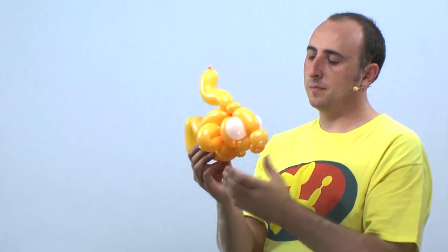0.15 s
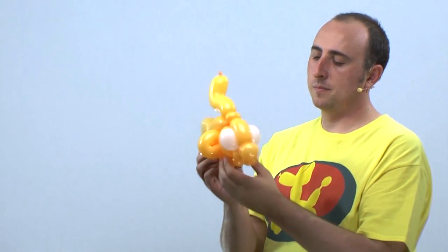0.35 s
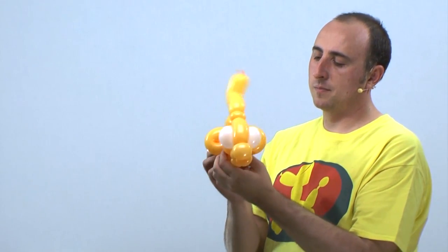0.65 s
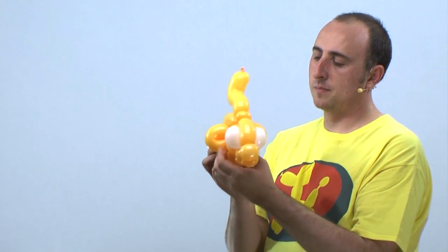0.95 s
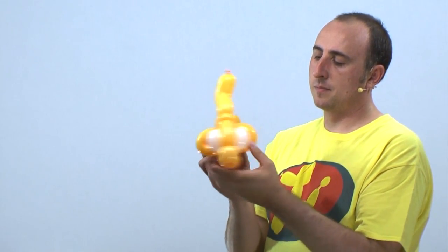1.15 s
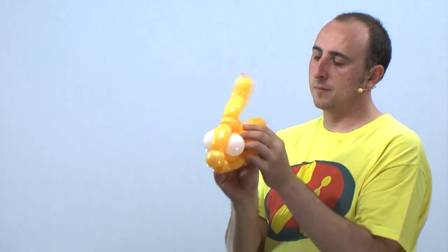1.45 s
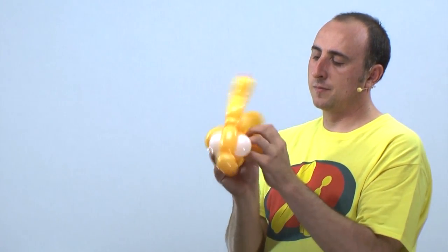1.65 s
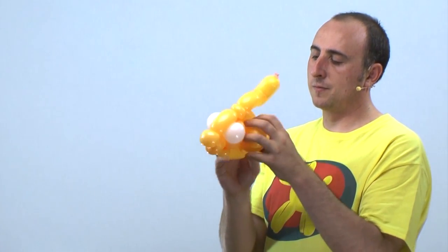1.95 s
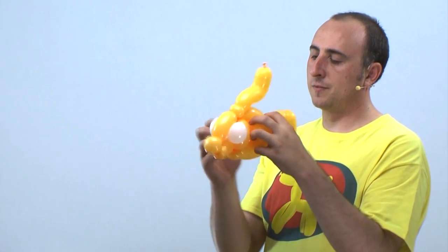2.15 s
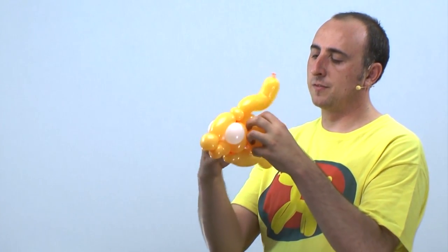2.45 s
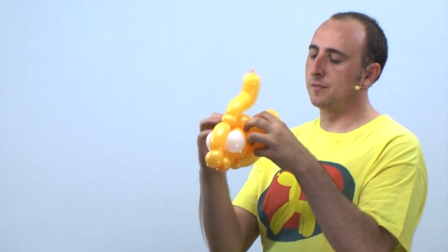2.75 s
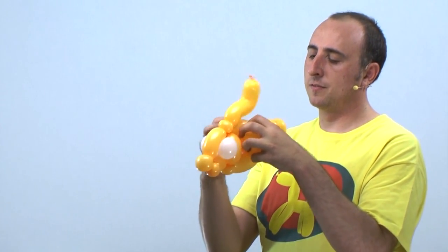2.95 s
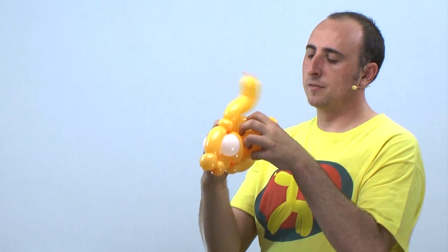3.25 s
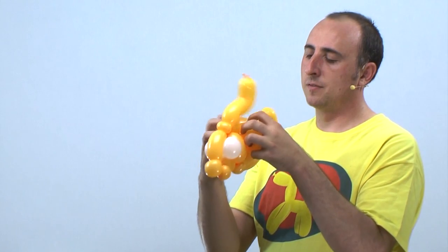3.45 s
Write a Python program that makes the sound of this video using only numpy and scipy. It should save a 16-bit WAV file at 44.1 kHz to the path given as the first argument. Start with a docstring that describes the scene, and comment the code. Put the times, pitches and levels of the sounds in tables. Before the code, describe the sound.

Rubber balloons rub against each other in someone's hands, close up in a quiet, dry studio. They squeak first, then crackle and snap with each squeeze, pause briefly, and resume with a creak and final squeaks.

```python
"""Hands twist and press a figure of inflated latex balloons in a dry studio, close to a small microphone.
Rubber sticks and slips; each slip rings briefly in the taut skins. First come short, regular squeaks
and two fingertip whistles. From 0.4 s a squeeze gives dense crackle and single snaps. After a lull,
more squeezes follow from 1.5 s, then one long creak at 3.1 s, last snaps and squeaks and a low thump."""
import sys
import numpy as np
from scipy import signal
from scipy.fft import rfft, irfft, next_fast_len
from scipy.io import wavfile

SR = 44100
rng = np.random.default_rng(int(sys.argv[2]) if len(sys.argv) > 2 else 0)


def log_audio(samples):
    """Write samples as a 16-bit WAV file to the path given in sys.argv[1]."""
    # one column per channel
    frames = np.atleast_2d(samples).T
    # limit to full scale, then quantise
    limited = np.clip(frames, -1, 1)
    pcm = np.round(limited * 32767).astype(np.int16)
    wavfile.write(sys.argv[1], SR, pcm)


N = 158760

# noise floor: f/Hz, level/dB
AIR_SPECTRUM = [(15, -32), (40, -9), (120, -7), (911, -7), (3250, -14), (9840, -29), (16000, -34)]
# whistles: t/s, length/s, top f/Hz, peak level/dB
WHISTLE_EVENTS = [(0.177, 0.037, 1556, -28), (0.263, 0.019, 1317, -35)]
# course of the creak: t/s, slip rate/Hz, level/dB
CREAK_PATH = [(3.085, 610, -5), (3.095, 830, -11), (3.110, 680, -13.5), (3.122, 370, -11.5),
              (3.132, 170, -10), (3.144, 500, -11.5), (3.161, 440, -9), (3.176, 230, -13.5),
              (3.183, 250, -8), (3.198, 260, -11.5), (3.217, 640, -12), (3.242, 290, -18)]
# modes of the creaking skin: f/Hz, base width/Hz, level/dB
CREAK_MODES = [(1295, 130, 3.5), (1784, 31, -5.5), (3250, 640, -1), (5130, 38, -15.5), (6570, 910, -9),
               (10250, 310, -19.5), (12600, 520, -18), (15700, 300, -21)]
# rubbing strokes: t/s, length/s, first level/dB, last level/dB, bass/dB, upper mid/dB, treble/dB
RUB_STROKES = [(0.167, 0.047, -62, -58.5, 19, 22, 22.5), (0.299, 0.04, -53, -70, 11, 13.5, 21.5),
               (0.378, 0.014, -37, -42, -17, 0, 3), (0.416, 0.085, -26, -31.5, -21.5, -7, -3),
               (0.47, 0.0067, -12.5, -24.5, 0, 4, 3.5), (0.51, 0.022, -22, -22, -11, -2.5, -5),
               (0.547, 0.014, -21, -26, -3, -1, 1), (0.578, 0.087, -29.5, -24, 0, 4, 0.5),
               (0.673, 0.17, -24.5, -28.5, -1, 1.5, -3.5), (0.812, 0.083, -33, -27.5, -13, 1, -4),
               (0.903, 0.097, -33.5, -23, -5.5, -2, -9.5), (0.965, 0.075, -31.5, -20.5, -8, -3, -5.5),
               (1.055, 0.033, -40, -20, -10, -1, -2), (1.287, 0.021, -28.5, -58, -36, 10.5, -10),
               (1.412, 0.02, -46.5, -57, -11, 5, 1), (1.478, 0.046, -40, -60, -3, -2, -5),
               (1.508, 0.053, -28.5, -28.5, 0, 1, -6), (1.566, .130, -24.5, -24, -0.5, -0.5, -5),
               (1.698, 0.065, -27.5, -27.5, 0, 0.5, -4), (1.777, 0.086, -28, -24.5, -4, 2, -6),
               (1.838, 0.097, -28.5, -37, -0.5, -0.5, -5), (1.961, 0.11, -33.5, -38.5, 2.5, 9.5, -4),
               (2.084, 0.02, -27.5, -25.5, -10, 0.5, -3), (2.158, 0.014, -31, -40, 2.5, 7, -4),
               (2.258, 0.051, -46, -36.5, 8, 12, -1), (2.348, 0.093, -35.5, -31, 9, 3.5, -8),
               (2.444, 0.16, -27, -28.5, 2.5, 5.5, -6), (2.601, 0.063, -31.5, -24, 4, 2, -11.5),
               (2.678, 0.078, -37, -41, 6, 2, -11), (2.761, 0.031, -23.5, -28.5, -0.5, 4.5, -10),
               (2.808, 0.028, -38, -27.5, 5.5, 2.5, -10), (2.849, 0.061, -23.5, -41, -2.5, 5.5, -2),
               (2.921, 0.035, -39, -33.5, 6, 9.5, -10), (2.973, 0.1, -31, -37, 9.5, 11, 1.5),
               (3.225, 0.057, -21.5, -40, -10, -6, -14), (3.276, 0.036, -31.5, -31, -2, 5.5, -9),
               (3.339, 0.079, -45, -48, 6, -0.5, -12), (3.419, 0.084, -38, -31, 8, -2, -15.5),
               (3.575, 0.022, -43, -30, -2, 4.5, -12)]
# squeaks, plus one bright snap (2.619 s) and one low thump (3.529 s, a single slip):
# t/s, length/s, first slip rate/Hz, last slip rate/Hz, level/dB, bass/dB, treble/dB, ring f/Hz
SLIP_BURSTS = [(0.0277, 0.021, 320, 380, -19, -7, 7, 4250), (.043, 0.014, 244, 370, -6.5, -3.5, 3.5, 900),
               (0.06, 0.038, 710, 450, -12, -14, 1.5, 4150), (.157, .012, 840, 980, -20.5, -50, 13.5, 3280),
               (0.341, 0.021, 990, 600, -26, 7, 18, 4350), (0.3665, 0.013, 630, 820, -9, -2, 5.5, 4760),
               (0.414, 0.006, 1380, 590, -9, -1, 5, 1310), (0.458, 0.0087, 970, 920, -5, 9.5, 2.5, 6550),
               (1.0792, 0.014, 310, 202, -3, 2, 3.5, 830), (1.2592, 0.027, 610, 830, -10.5, -5, 4, 5100),
               (1.94, 0.018, 260, 416, -1, 1.5, 4, 556), (2.078, 0.0081, 640, 560, -5.5, 6, 2, 3100),
               (2.128, 0.011, 950, 500, -7.5, 8, 5, 3060), (2.619, 0.0034, 900, 900, -8.5, -10, 14, 9000),
               (2.6477, 0.025, 226, 174, -4.5, -14, 2.5, 2970), (3.529, .001, 300, 300, -3.5, 16, 6, 2830),
               (3.3207, 0.016, 420, 270, -0.5, -3.5, 3, 2650), (3.551, 0.0095, 590, 640, -3, 0, 2, 2840)]
# snaps: t/s, level/dB
SNAP_EVENTS = [(.613, -5), (.726, -2.5), (0.747, 0), (0.829, -5), (.870, 0), (.912, -3.5), (0.9247, 4.5),
               (0.934, -9), (.945, -4.5), (1.051, -4.5), (1.206, -27), (1.341, -24.5), (1.616, -6),
               (1.632, -21), (1.645, -18), (1.658, -17), (1.784, -7), (2.229, -28), (2.437, -12),
               (2.463, -8), (2.498, -9), (2.596, -23), (2.755, -18.5), (2.799, -1), (2.964, -7.5),
               (3.46, -11), (3.4695, -10), (3.48, -2)]
# skin response: f/Hz, level/dB
SKIN_RESPONSE = [(60, -20.5), (153, -3.5), (427, 3.5), (636, 7), (991, 7.5), (1310, 5.5), (1910, -5),
                 (3580, -3), (6000, -5.5), (13000, -10), (16000, -9.5)]
# colour registers (bass, mid, upper mid, treble): f/Hz
COLOUR_HZ = [300, 1200, 3500, 10000]

PATCH_DB, PATCH_RATE_HZ = 3.5, 19.2  # swell and fade of each resonance
FIRM_SPREAD_DB = 2.5  # grip scatter of snaps and slip bursts


def amp(db):
    """Decibels to gain."""
    return 10 ** (np.asarray(db) / 20)


def unit_rms(x):
    """Scale to rms 1."""
    return x / np.sqrt(np.mean(x ** 2) + 1e-20)


def drift(rate_hz):
    """Smooth random curve, spread 1."""
    hop = 40
    r = np.exp(-2 * np.pi * hop * rate_hz / SR)
    slow = signal.lfilter([1], [1, -2 * r, r * r], rng.standard_normal(N // hop + 2002))[2000:]
    return np.interp(np.arange(N) / hop, np.arange(len(slow)), unit_rms(slow))


def resonate(x, hz, width_hz):
    """Two-pole resonance, unit peak gain."""
    r = np.exp(-np.pi * width_hz / SR)
    poles = [1, -2 * r * np.cos(2 * np.pi * hz / SR), r * r]
    return signal.lfilter(np.array([1, 0, -1]) * (1 - r * r) / 2, poles, x + 1e-18)


def slip_times(path_s, rate_hz, jitter):
    """One slip at the start, then one per step of sliding; jitter in steps."""
    t = np.arange(path_s[0], path_s[-1], 1 / SR)
    steps = np.cumsum(np.interp(t, path_s, rate_hz)) / SR
    wobble = rng.standard_normal(200)
    whole = np.arange(int(steps[-1]) + 1)
    return np.interp(whole + jitter * wobble[whole] * (whole > 0), steps, t)


def air(level_db=-52.5):
    """Faint steady room and microphone noise."""
    hz, db = np.transpose(AIR_SPECTRUM)
    bins_hz = np.maximum(np.arange(N // 2 + 1) * SR / N, 1)
    shape = amp(np.interp(np.log(bins_hz), np.log(hz), db))
    return amp(level_db) * unit_rms(irfft(rfft(rng.standard_normal(N)) * shape, N))


def room(x, t60_s=0.19, cut_hz=20000, level_db=-22):
    """Reflections: ten feedback delays, duller each round."""
    size = next_fast_len(N + SR)
    hz = np.arange(size // 2 + 1) * SR / size
    response = 0
    for k, lag_s in enumerate(np.geomspace(.007, .023, 10)):
        loss = amp(-60 * lag_s / t60_s) / (1 + 1j * hz / cut_hz) ** (lag_s / .015)
        loop = loss * np.exp(-2j * np.pi * hz * lag_s)
        response += (-1) ** k * loop / (1 - loop)
    return amp(level_db) * irfft(rfft(x, size) * response, size)[:N]


def whistles(arch_depth=0.078, overtone_db=-16.5):
    """A fast-sliding fingertip squeals: near-sine, arched in pitch and level."""
    t, out = np.arange(N) / SR, 0
    waver = 0.038 * drift(110)
    for start_s, length_s, hz, db in WHISTLE_EVENTS:
        arch = np.sin(np.pi * np.clip((t - start_s) / length_s, 0, 1)) ** .5
        phase = 2 * np.pi * np.cumsum(hz * (1 + arch_depth * (arch - 1) + waver)) / SR
        overtones = sum(np.sin(k * phase) for k in range(2, 5))
        out += amp(db) * arch * (np.sin(phase) + amp(overtone_db) * overtones)
    return out


def creak(gain_db=19.5, spread_db=1.5, bend=0.035, damping=0.078):
    """One contact slips at a changing pace and rings one small balloon; squeezing bends its modes."""
    path_s, rate_hz, path_db = np.transpose(CREAK_PATH)
    at = (slip_times(path_s, rate_hz, jitter=0.2) * SR).astype(int)
    out, age = np.zeros(N), np.arange(1500)
    shared_drift = drift(PATCH_RATE_HZ)[at]
    for k, (hz, width_hz, mode_db) in enumerate(CREAK_MODES):
        chance_db = spread_db * rng.standard_normal(200)[:len(at)]
        chance_db += PATCH_DB * drift(2 * PATCH_RATE_HZ)[at]
        size = amp(np.interp(at / SR, path_s, path_db) + gain_db + mode_db + chance_db)
        pitch_hz = hz * (1 + bend * (shared_drift + drift(2 * PATCH_RATE_HZ)[at]) / 2)
        decay = np.pi * (width_hz + damping * hz) / SR
        envelope = 2 * decay ** 2 * age * np.exp(-decay * age)
        rings = size[:, None] * envelope * np.cos(2 * np.pi * np.outer(pitch_hz, age) / SR)
        out += (-1) ** k * np.bincount((at[:, None] + age).ravel(), rings.ravel(), N)
    return out


def rubbing(rate_hz=2200, gain_db=9.5, spread_db=5.5, attack_s=0.0033, release_db_per_s=873):
    """Crackle: random, mostly small slips in clumps; each stroke swells, ramps and dies away."""
    size = rng.choice([-1, 1], N) * amp(3.5 * np.minimum(rng.exponential(1, N), 4))
    slipping = rng.random(N) < rate_hz / SR
    clumps = amp(1.5 * drift(70))
    size = amp(gain_db) * unit_rms(size * slipping * clumps)[slipping]
    t = np.flatnonzero(slipping) / SR
    power = np.full((4, len(t)), 1e-12)
    for start_s, length_s, first_db, last_db, bass_db, upper_db, treble_db in RUB_STROKES:
        db = np.interp(t, [start_s, start_s + length_s], [first_db, last_db])
        db -= release_db_per_s * np.maximum(t - start_s - length_s, 0)
        attack = np.clip((t - start_s) / attack_s, 0, 1)
        power += (attack * amp(db + np.vstack([bass_db, 0, upper_db, treble_db]))) ** 2
    ring_hz = np.ones_like(t)  # below all modes: none favoured
    return t, size, 10 * np.log10(power), np.full_like(t, spread_db), ring_hz


def dullness_db(t, share=0.83):
    """A large slip is slightly dull on top and shares the treble loss of the latest stroke."""
    start_s, *_, treble_db = np.transpose(RUB_STROKES)
    stroke = np.maximum(np.searchsorted(start_s, t) - 1, 0)
    return share * np.minimum(treble_db[stroke], 0) - 0.5


def slip_bursts(gain_db=7.5):
    """Squeaks (short runs of slips), plus one bright snap and one low thump."""
    rows = []
    for start_s, length_s, first_hz, last_hz, db, bass_db, treble_db, ring_hz in SLIP_BURSTS:
        t = slip_times([start_s, start_s + length_s], [first_hz, last_hz], jitter=.09)
        size = amp(db + gain_db - 0.5 * rng.standard_normal(200)[:len(t)])
        colour_db = (bass_db, 0, treble_db, treble_db + dullness_db(start_s))
        rows += [(*slip, ring_hz, *colour_db) for slip in zip(t, size)]
    t, size, ring_hz, *colour_db = np.transpose(rows)
    return t, size, np.array(colour_db), np.full_like(t, FIRM_SPREAD_DB), ring_hz


def snaps(gain_db=10, bright_db=2, body_hz=1294):
    """Single large slips that favour the body ring."""
    t, db = np.transpose(SNAP_EVENTS)
    flat = np.zeros_like(t)
    colour_db = np.array([flat, flat, flat + bright_db, bright_db + dullness_db(t)])
    return t, amp(db + gain_db), colour_db, flat + FIRM_SPREAD_DB, flat + body_hz


def skins(t, size, colour_db, spread_db, ring_hz, q=11.92, coupling_db=-7.5, cross_hz=3250):
    """Slips strike a ladder of short skin resonances, grip each by chance and may favour one ring."""
    out, at = np.zeros(N), np.minimum((t * SR).astype(int), N - 1)
    skin_hz, skin_db = np.transpose(SKIN_RESPONSE)
    ripple_hz = cross_hz * (1 + .07 * drift(PATCH_RATE_HZ)[at])
    for k, hz in enumerate(np.geomspace(70, 16000, 56)):
        register = np.interp(np.log(hz), np.log(COLOUR_HZ), np.arange(4))
        low = min(int(register), 2)
        db = colour_db[low] + (register - low) * (colour_db[low + 1] - colour_db[low])
        db += np.interp(np.log(hz), np.log(skin_hz), skin_db)
        db += PATCH_DB * drift(PATCH_RATE_HZ)[at]
        db += spread_db * rng.standard_normal(N)[at]
        db += 9 * np.exp(-(np.log2(hz / ring_hz) / .3) ** 2)  # favoured ring
        # strongest near multiples of one cross mode of the tubes
        db += 4.5 * min(hz / cross_hz, 1) ** 2 * np.cos(2 * np.pi * hz / ripple_hz)
        strikes = np.bincount(at, size * amp(db + coupling_db), N)
        ring = resonate(strikes, hz, hz / q)
        if hz > cross_hz:
            ring = resonate(ring, hz, 2 * hz / q)
        out += (-1) ** (k // 3) * ring
    # deep bass below about 110 Hz is faint
    return signal.sosfilt(signal.butter(2, 112, "high", fs=SR, output="sos"), out)


def scene():
    """Rubbing, snaps and slip bursts ring the skins; creak, whistles, room and air add in. Mono."""
    slips = [np.concatenate(part, axis=-1) for part in zip(rubbing(), snaps(), slip_bursts())]
    balloons = skins(*slips) + creak() + whistles()
    return (balloons + room(balloons) + air())[None]


def record(dry):
    """Soft clip, then steep low-pass."""
    rounded = .7 * np.tanh(dry / .7)
    return signal.sosfilt(signal.cheby2(14, 70, 16600, fs=SR, output="sos"), rounded)


dry = scene()
out = record(dry)
log_audio(out)
```